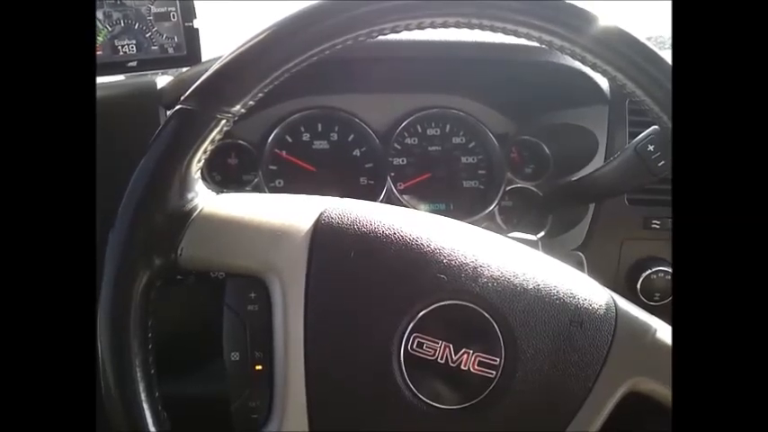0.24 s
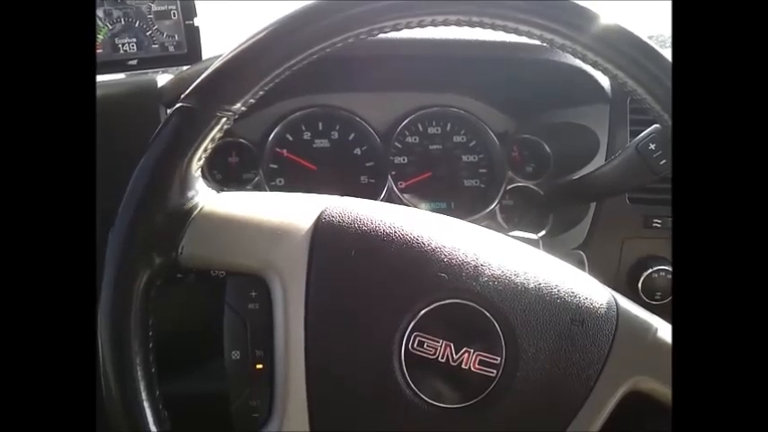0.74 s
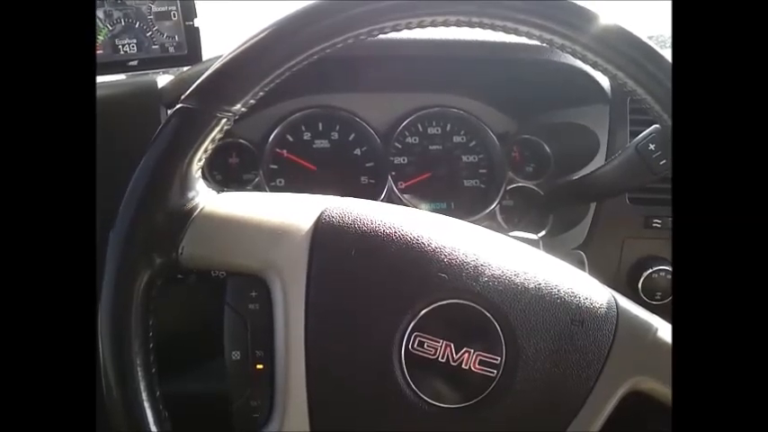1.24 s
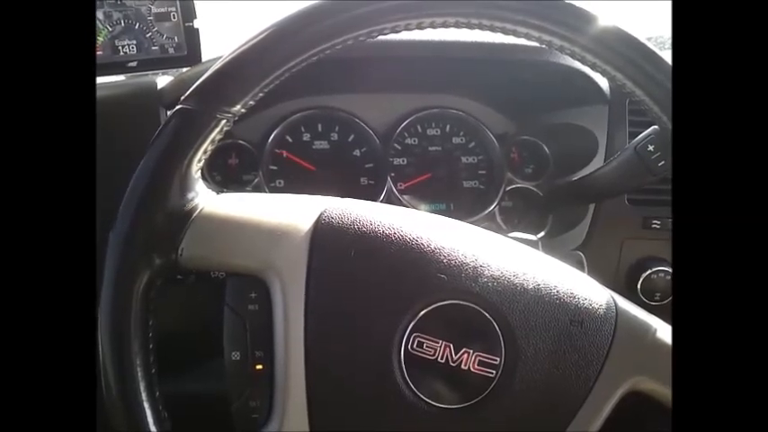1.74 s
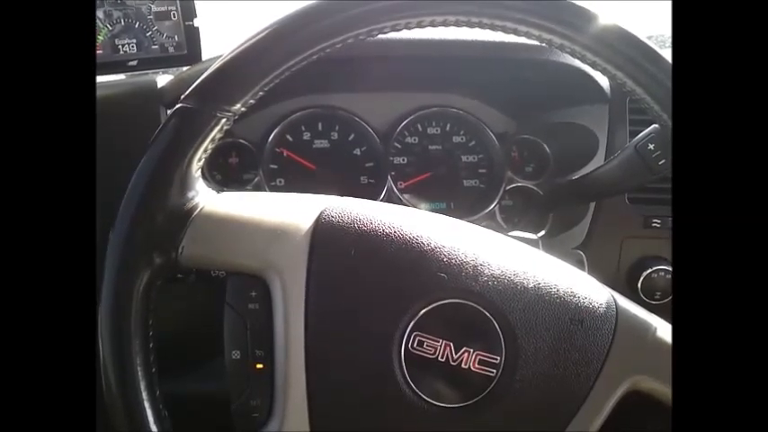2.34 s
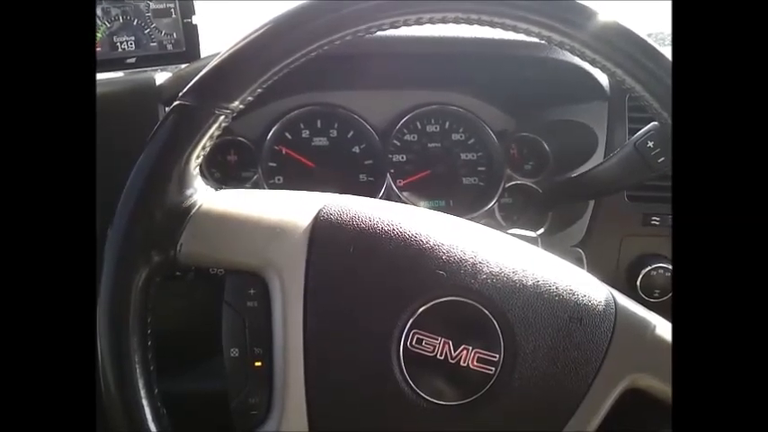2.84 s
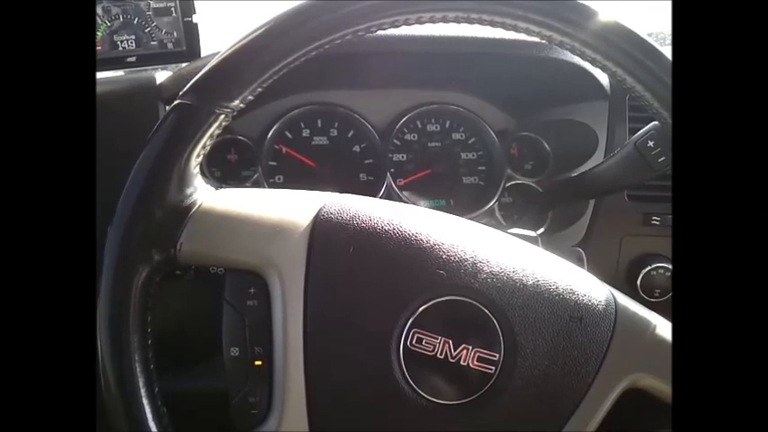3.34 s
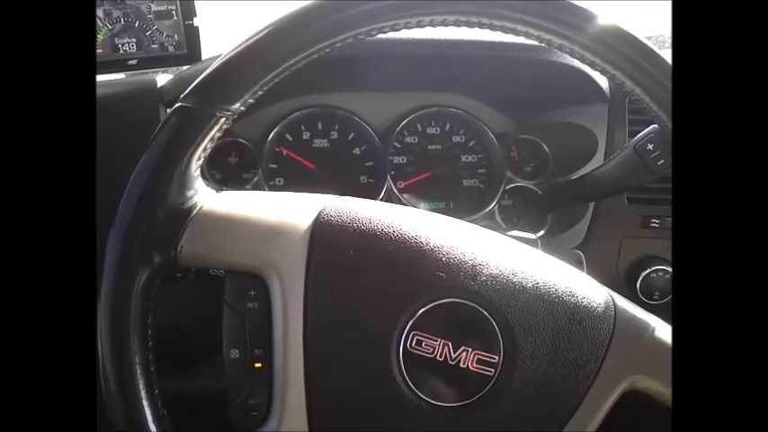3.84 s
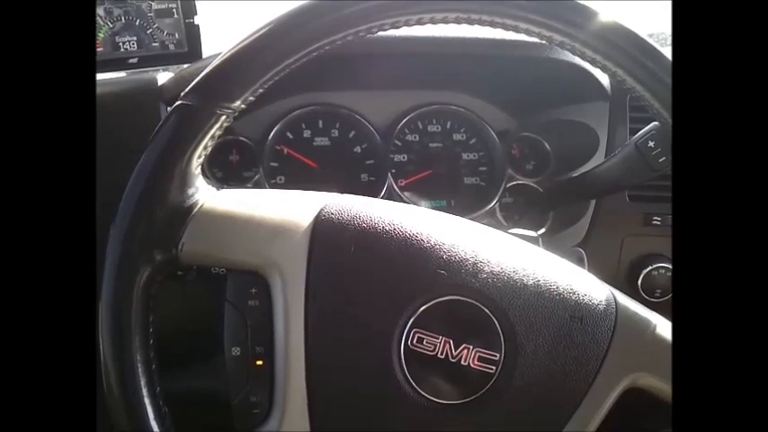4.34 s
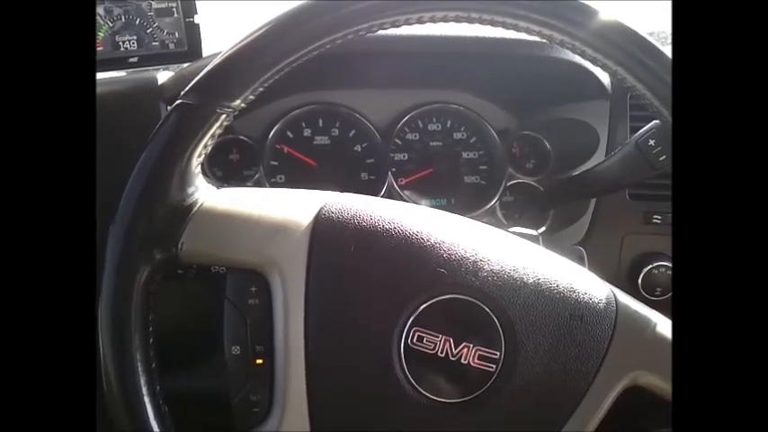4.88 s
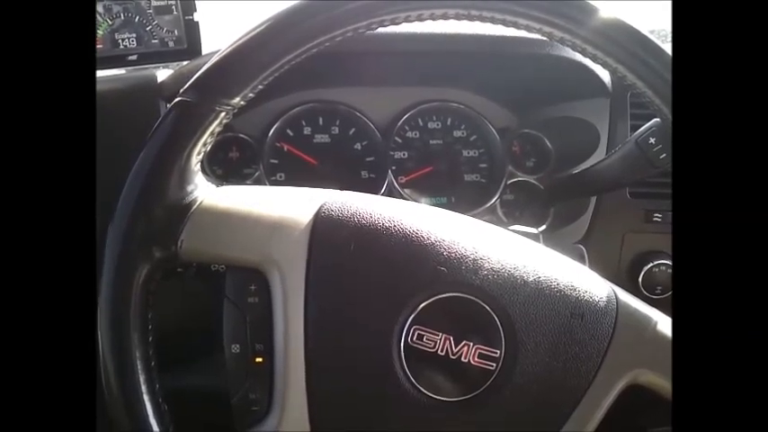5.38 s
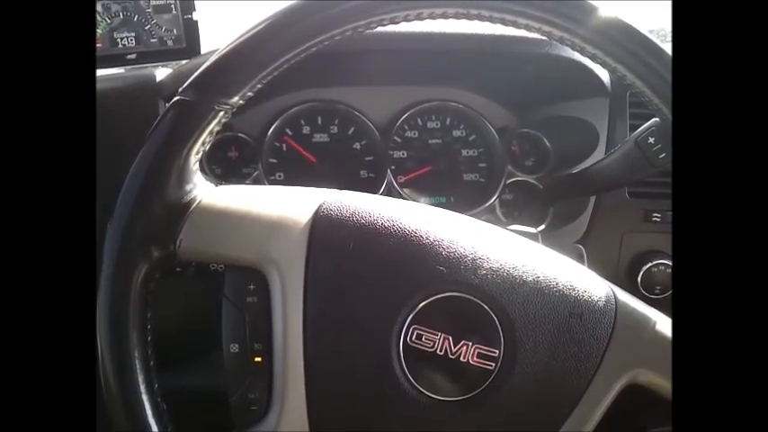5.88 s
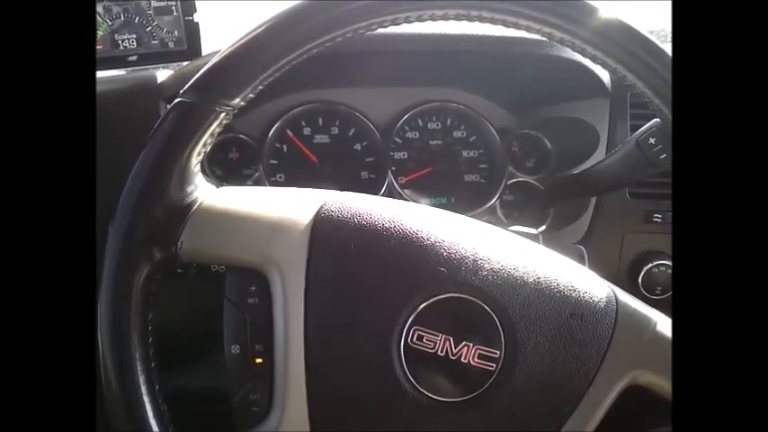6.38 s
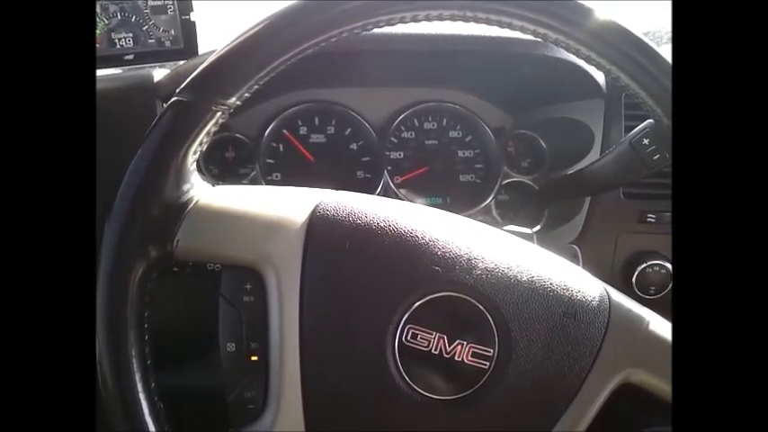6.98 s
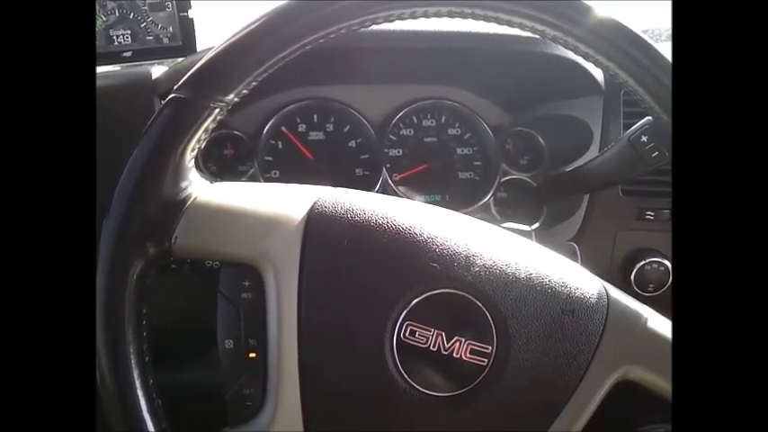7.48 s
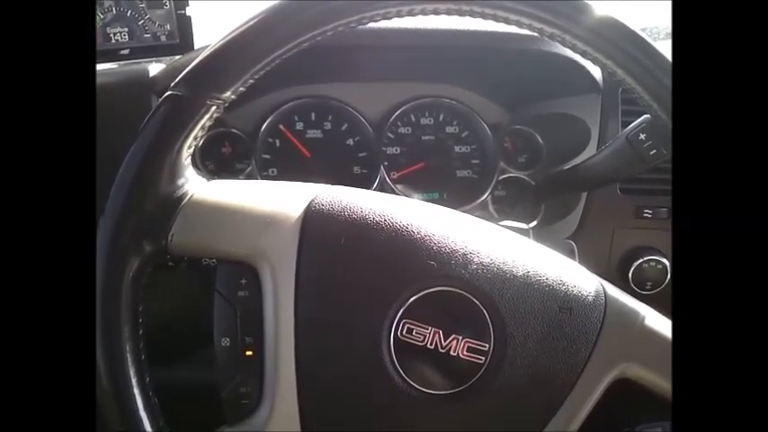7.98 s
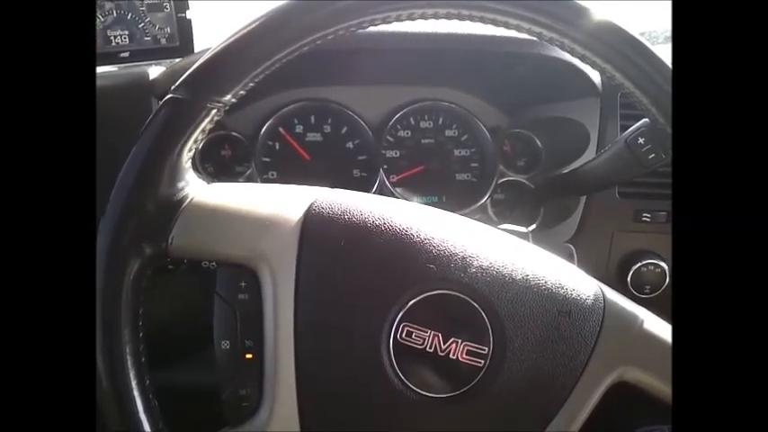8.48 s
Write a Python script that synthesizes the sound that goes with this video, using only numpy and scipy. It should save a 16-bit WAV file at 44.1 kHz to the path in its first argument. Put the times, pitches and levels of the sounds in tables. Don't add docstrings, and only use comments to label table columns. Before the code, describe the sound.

From the driver's seat of a parked truck, a diesel engine hums low with soft, dense clatter. It lifts slightly early on, then clearly around the middle. A thin turbocharger whistle glides slowly upward, levels off, and swells strongly near the end over increasing airy rush. Close, boxy mono cab sound with a limited, slightly dull top end.

```python
import sys
import numpy as np
from scipy import signal
from scipy.fft import rfft, irfft
from scipy.io import wavfile
from scipy.ndimage import map_coordinates

SR = 44100
rng = np.random.default_rng(int(sys.argv[2]) if len(sys.argv) > 2 else 0)


def decibels_to_gain(level_db):
    exponent = np.asarray(level_db, float) / 20
    return 10 ** exponent


def put_to_file(sound):
    columns = np.atleast_2d(sound).T
    safe = np.clip(columns, -1, 1)
    whole_steps = np.round(safe * 32767)
    wavfile.write(sys.argv[1], SR, whole_steps.astype(np.int16))


N = 384552

# t/s, firing f/Hz
FIRING_HZ_AT_S = [(0.0, 66.4), (0.5, 67.1), (1.2, 67.6), (1.4, 68.5), (1.6, 71.9), (5.2, 72.4), (5.4, 80.1),
                  (5.6, 88.5), (5.8, 95.2), (6.0, 99.0), (6.35, 100.6), (7.6, 98.3), (8.4, 99.5),
                  (8.72, 99.4)]
# firing f/Hz, firing level/dB, octave level/dB, crank level/dB, one-bank level/dB
ORDERS_AT_HZ = [(67.6, -28, -37, -52, -48), (68.6, -33, -42, -55, -46), (71.5, -43, -35, -42, -57),
                (74, -43, -35, -42, -57), (80, -31, -31, -45, -57), (89, -34.5, -33, -54, -52),
                (95, -34, -46, -46, -45), (99, -28.7, -52, -41, -47)]
# firing f/Hz, boom level/dB, clatter level/dB, floor panel level/dB, air brightness/(dB/octave)
SHAKE_AT_HZ = [(62.6, -32, -35.5, -37, 2.5), (73, -30.5, -35, -35.5, -1.5), (94, -30, -33, -41, -2),
               (99, -29.5, -33, -49.5, -1)]
# f/Hz, level/dB per Hz
BOOM_SPECTRUM = [(4, -29.5), (20, -25), (45, -18.5), (75, -8.5), (98, -14), (118, 0), (145, -3.5),
                 (168, 1.5), (190, -5.5), (205, -7), (280, -15), (340, -20)]
# f/Hz, level/dB per Hz
CLATTER_SPECTRUM = [(220, -7), (300, 1.5), (450, -1.5), (600, -3.5), (800, -7), (1300, -6), (2000, -9),
                    (2300, -25), (4000, -24.5), (7000, -31), (8300, -45.5)]
# f/Hz, width/Hz, level/dB
CAB_MODES = [(310, 34, -5), (555, 130, 4.5), (753, 130, -6), (851, 54, 7), (955, 46, 5), (1119, 31, -10),
             (1281, 23, 3.5), (1798, 180, -7), (1910, 110, 7), (2137, 64, -11), (2224, 67, 8.5),
             (2340, 45, 6.5), (2534, 53, 4), (2670, 30, -5.5), (2828, 65, 3.5), (3124, 85, -9.5),
             (3420, 110, 0), (3570, 60, 0), (3770, 39, -9), (3740, 57, -4), (3840, 55, 4.5), (4160, 57, -1),
             (4380, 120, -3.5), (4570, 64, 2), (4900, 50, 5.5), (5030, 120, -2.5), (5610, 100, 7),
             (6055, 140, 5.5), (6230, 80, -5), (7040, 170, 2.5)]
# t/s, f/Hz
SHAFT_HZ_AT_S = [(0.0, 1662), (0.3, 1687), (0.8, 1732), (1.0, 1756.6), (1.75, 1842.7), (2.25, 1910.8),
                 (3.0, 2023.6), (4.0, 2157), (4.5, 2216.1), (4.75, 2239.1), (5.0, 2254.9), (5.5, 2259.6),
                 (5.75, 2254.7), (6.5, 2243.3), (7.25, 2229.2), (7.75, 2224.7), (8.72, 2222.8)]
# t/s, level/dB
WHISTLE_DB_AT_S = [(0.0, -50), (0.25, -46), (1.0, -47), (1.75, -46), (2.2, -42.5), (3.0, -45), (3.7, -48),
                   (4.75, -47), (5.05, -42.5), (5.35, -46), (5.75, -37), (6.5, -40), (7.03, -48),
                   (7.3, -35), (7.65, -28), (8.03, -35.5), (8.25, -30), (8.72, -29.5)]
# f/Hz, width/Hz, level/dB
WHISTLE_NULLS = [(1716, 40, -20), (1789, 24, -16), (1848, 16, -6), (2024, 24, -8), (2090, 20, -6),
                 (2182, 46, -20), (2240, 8, -4)]
# t/s, length/s, peak level/dB
SECOND_FLARES = [
    (3.9, .4, -55),
    (5.0, 0.45, -53),
    (5.65, 0.32, -52),
    (6.093, 0.5, -47.5),
    (6.52, 0.64, -37.5),
    (7.65, .5, -41.5),
    (8.216, 0.34, -37),
    (8.626, 0.33, -35.5),
]
# t/s, length/s, peak level/dB
THIRD_FLARES = [(1.35, .7, -56), (1.79, .3, -44), (2.5, .7, -52), (3.2, .2, -53), (3.85, .3, -53),
                (4.3, .3, -55), (4.8, .2, -53), (5.8, .4, -50), (6.3, .4, -50), (7.75, .5, -30.5),
                (8.45, .6, -43)]
# t/s, f/Hz, level/dB, third multiple level/dB
TRAILING_WHISTLE = [(0.0, 1618, -50, -68), (0.3, 1643, -41.5, -66), (0.7, 1682, -46, -68),
                    (1.05, 1716, -50, -66), (1.3, 1742, -60, -66), (1.6, 1773, -48, -66),
                    (1.95, 1817, -56, -64), (2.15, 1844, -56, -50), (2.4, 1879, -56, -63),
                    (3.1, 1972, -57, -56), (3.45, 2022, -57, -63), (3.75, 2065, -56, -56),
                    (4.25, 2131, -57, -54), (4.6, 2180, -56, -61), (5.0, 2232, -58, -55),
                    (5.3, 2243, -62, -56), (5.9, 2240, -66, -54), (6.3, 2238, -75, -75)]
# multiple of shaft speed, level/dB
BEARING_TONES = [(2.528, -58), (3.42, -54), (4.02, -61)]
# f/Hz, width/Hz, level/dB
HOUSING_MODES = [(4900, 50, -7), (5530, 70, 1), (5710, 90, 0), (6400, 150, -3), (6990, 120, 1)]
# t/s, level/dB
FLOW_DB_AT_S = [(0.0, -45.5), (0.4, -46), (1.4, -45.5), (2.25, -41.5), (3.0, -41.5), (3.6, -39.5),
                (4.5, -38.5), (5.2, -38), (5.8, -35.5), (6.3, -34), (6.7, -33), (7.05, -34.5), (7.4, -32.5),
                (7.8, -30), (8.2, -31), (8.72, -28)]
# t/s, length/s, pipe level/dB, elbow level/dB
DUCT_SURGES = [(0.1, .5, 2, -9), (0.7, 1.0, 2, 2), (2.3, 1.2, -4, 1.5), (3.65, 1, 5, 5.5),
               (4.413, 0.1, 7, -3), (4.95, .3, 6, -0.5), (5.5, 1, 6.5, 4), (6.164, 0.33, 3, 2.5),
               (6.8, .3, 1.5, 1), (7.25, 1, 7.5, 3), (7.8, .4, 1.5, 2), (8.1, .2, -1, 0.5),
               (8.396, 0.35, 1, 3.5)]
# f/Hz, level/dB per Hz
RUSH_SPECTRUM = [(600, -11), (850, -8.5), (1300, -2.5), (1900, -3), (2500, -1.5), (3300, 1.5), (4000, -6),
                 (4600, -4.5), (5200, -7.5), (5700, -6.5), (6800, -5.5), (7050, -14), (7450, -14.5),
                 (8300, -33.5)]
# f/Hz, width/Hz, level/dB
PIPE_MODES = [(1657.7, 40, 2), (1692, 29, -1.5), (1554, 30, -5.5)]
# f/Hz, width/Hz, level/dB
ELBOW_MODES = [(1888, 74, 0.5), (1935, 60, 4), (2024, 63, -3)]
# f/Hz, width/Hz, level/dB
SHROUD_MODES = [(4520, 110, 0), (5700, 60, -3)]
# t/s, f/Hz, level/dB
PUMP_HUM = [(0.8, 242.7, -60), (1.5, 253.5, -41), (2.4, 264.2, -43), (3.2, 269.5, -47), (4.4, 275, -47),
            (5.6, 276, -46), (6.0, 281, -64)]
# t/s, f/Hz, level/dB
FAN_HUM = [(2.3, 402, -64), (2.7, 404, -47), (4.6, 404.8, -52.5), (5.2, 404.3, -55.5), (5.85, 547.4, -46),
           (6.2, 605, -43), (6.5, 620, -73)]


def in_time(rows):
    s, *columns = np.transpose(rows)
    return [np.interp(np.arange(N) / SR, s, column) for column in columns]


def at_speed(rows, firing_hz):
    hz, *columns = np.transpose(rows)
    return [np.interp(firing_hz, hz, column) for column in columns]


def swells(rows):
    s, length_s = np.transpose(rows)[:2, :, None]
    return np.exp(-(2 * (np.arange(N) / SR - s) / length_s) ** 2)


def rms_one(x):
    return x / np.sqrt(np.mean(x ** 2) + 1e-20)


def drift(rate_per_s):
    pole = np.exp(-80 * np.pi * rate_per_s / SR)
    sparse = rng.standard_normal(N // 40 + 2002)
    slow = signal.lfilter([1], [1, -2 * pole, pole * pole], sparse)[2000:]
    return np.interp(np.arange(N) / 40, np.arange(len(slow)), rms_one(slow))


def tone(turns, level_db, flutter_db, rate_per_s):
    height = np.sqrt(2) * decibels_to_gain(level_db + flutter_db * drift(rate_per_s))
    return height * np.sin(2 * np.pi * (turns + rng.random()))


def resonate(x, hz, width_hz):
    r = np.exp(-np.pi * width_hz / SR)
    poles = [1, -2 * r * np.cos(2 * np.pi * hz / SR), r * r]
    return signal.lfilter([(1 - r * r) / 2, 0, (r * r - 1) / 2], poles, x)


def resonate_twice(x, hz, width_hz):
    return resonate(resonate(x, hz, width_hz), hz, width_hz)


def through_cab(x, spectrum):
    hz = np.arange(N // 2 + 1) * SR / N + 1e-3
    points = np.array(spectrum)
    level_db = np.interp(np.log(hz), np.log(points[:, 0]), points[:, 1], left=-80, right=-80)
    for centre_hz, width_hz, bell_db in CAB_MODES:
        level_db += bell_db / (1 + (2 * (hz - centre_hz) / width_hz) ** 2)
    return rms_one(irfft(rfft(x) * decibels_to_gain(level_db), N))


def framewise(x, gain, size):
    hz, s, frames = signal.stft(x, SR, nperseg=size)
    return signal.istft(frames * gain(hz[:, None], s[None]), SR, nperseg=size)[1][..., :N]


def firing_orders(turns, firing_hz):
    firing_db, octave_db, crank_db, bank_db = at_speed(ORDERS_AT_HZ, firing_hz)
    orders = tone(turns, firing_db, flutter_db=0.6, rate_per_s=4.0)
    orders += tone(2 * turns, octave_db, flutter_db=1.5, rate_per_s=3.0)
    orders += tone(4 * turns, firing_db - 21, flutter_db=2.0, rate_per_s=3.0)
    orders += tone(turns / 4, crank_db, flutter_db=1.2, rate_per_s=1.5)
    orders += tone(turns * 3 / 8, bank_db, flutter_db=2.0, rate_per_s=1.5)
    return orders


def uneven_firings(turns):
    fired = np.diff(np.floor(turns), prepend=0)
    surplus = rng.standard_normal(8)
    cylinder = np.floor(turns).astype(int) % 8
    return fired * (surplus - surplus.mean())[cylinder]


def engine(firing_hz):
    boom_db, clatter_db, panel_db, _ = at_speed(SHAKE_AT_HZ, firing_hz)
    fade_from_s, fade_db_per_s = 7.9, 1
    boom_db -= fade_db_per_s * np.maximum(np.arange(N) / SR - fade_from_s, 0)
    turns = np.cumsum(firing_hz) / SR
    orders = firing_orders(turns, firing_hz)
    pattern = uneven_firings(turns)
    boom = through_cab(rng.standard_normal(N), BOOM_SPECTRUM) + decibels_to_gain(-9) * through_cab(pattern, BOOM_SPECTRUM)
    knock = rng.standard_normal(N) * (1 + 0.12 * np.cos(2 * np.pi * turns))
    clatter = through_cab(knock, CLATTER_SPECTRUM)
    panel = rms_one(resonate(rng.standard_normal(N), hz=456, width_hz=47))
    shake = decibels_to_gain(boom_db - 1.0) * boom + decibels_to_gain(clatter_db - 0.5) * clatter + decibels_to_gain(panel_db - 2.5) * panel
    return orders + shake


def overtone(turns, flares, flow_db):
    height = decibels_to_gain(flow_db - 29) + decibels_to_gain(np.array(flares)[:, 2]) @ swells(flares)
    return height * tone(turns, 0, flutter_db=1.2, rate_per_s=7.0)


def trailing_whistle():
    hz, level_db, third_db = in_time(TRAILING_WHISTLE)
    turns = np.cumsum(hz) / SR
    whistle = tone(turns, level_db, flutter_db=1.3, rate_per_s=6.0)
    return whistle + tone(3 * turns, third_db, flutter_db=2.0, rate_per_s=5.0)


def bearings(turns):
    tones = sum(tone(k * turns, db, flutter_db=2.5, rate_per_s=3.0) for k, db in BEARING_TONES)
    return sum(decibels_to_gain(db) * resonate_twice(tones, hz, width_hz) for hz, width_hz, db in HOUSING_MODES)


def turbo(shaft_hz, whistle_db, flow_db):
    turns = np.cumsum(shaft_hz + 0.83 * drift(8.0)) / SR
    cancel_db = sum(db * np.exp(-(2 * (shaft_hz - hz) / width_hz) ** 2)
                    for hz, width_hz, db in WHISTLE_NULLS)
    whistle = tone(turns, whistle_db + cancel_db, flutter_db=1.3, rate_per_s=6.0)
    whistle += overtone(2 * turns, SECOND_FLARES, flow_db)
    whistle += overtone(3 * turns, THIRD_FLARES, flow_db)
    whistle += trailing_whistle()
    whistle += tone(3.05 * turns, flow_db - 21, flutter_db=3.0, rate_per_s=3.0)
    return whistle + bearings(turns)


def patches(spread_db, width_hz, hold_s):
    field = rng.standard_normal((400, 100))

    def gain(hz, s):
        where = np.broadcast_arrays(hz / width_hz, s / hold_s)
        return decibels_to_gain(spread_db * map_coordinates(field, where, order=1))
    return gain


def sing(air, modes):
    return rms_one(sum(decibels_to_gain(db) * resonate_twice(air, hz, 1.5 * width_hz) for hz, width_hz, db in modes))


def duct_levels(flow_db):
    pipe_db, elbow_db = flow_db + np.transpose(DUCT_SURGES)[2:] @ swells(DUCT_SURGES)
    flicker_db, flicker_per_s = 1.5, 6.0
    pipe_db += -3.5 + flicker_db * drift(flicker_per_s)
    elbow_db += 0.5 + flicker_db * drift(flicker_per_s)
    return pipe_db, elbow_db


def intake(flow_db, brightness_db):
    pipe_db, elbow_db = duct_levels(flow_db)
    air = rng.standard_normal((4, N))
    sway = patches(spread_db=2.8, width_hz=70, hold_s=0.5)

    def colour(hz, s):
        slope_db = brightness_db[np.minimum(s * SR, N - 1).astype(int)]
        octaves_up = np.log2(np.maximum(hz / 3300, 1))
        return sway(hz, s) * decibels_to_gain(slope_db * octaves_up)
    rush = framewise(through_cab(air[0], RUSH_SPECTRUM), colour, size=2048)
    ducts = decibels_to_gain(pipe_db - 0.5) * sing(air[1], PIPE_MODES) + decibels_to_gain(elbow_db - 2.5) * sing(air[2], ELBOW_MODES)
    shroud = decibels_to_gain(1.7 * (flow_db + 30) - 40) * sing(air[3], SHROUD_MODES)
    return shroud + ducts + decibels_to_gain(flow_db + 3.5) * rush


def hum(rows):
    hz, level_db = in_time(rows)
    return tone(np.cumsum(hz) / SR, level_db, flutter_db=1.0, rate_per_s=3.0)


def scene():
    firing_hz, = in_time(FIRING_HZ_AT_S)
    shaft_hz, = in_time(SHAFT_HZ_AT_S)
    whistle_db, = in_time(WHISTLE_DB_AT_S)
    flow_db, = in_time(FLOW_DB_AT_S)
    brightness_db = at_speed(SHAKE_AT_HZ, firing_hz)[-1]
    air = intake(flow_db, brightness_db)
    cab = engine(firing_hz) + hum(PUMP_HUM) + hum(FAN_HUM) + turbo(shaft_hz, whistle_db, flow_db) + air
    return np.array([cab, cab])


def low_pass(x):
    return signal.sosfilt(signal.butter(12, 8020, fs=SR, output="sos"), x)


def record(dry):
    extra_steps = np.floor(1.7 * rng.exponential(1, 400))

    def below_edge(hz, s):
        return hz < 7413 + 52 * extra_steps[np.arange(s.size)]
    mix = framewise(dry, below_edge, size=3600) + 0.0014
    return low_pass(mix)


dry = scene()
out = record(dry)
put_to_file(out)
```